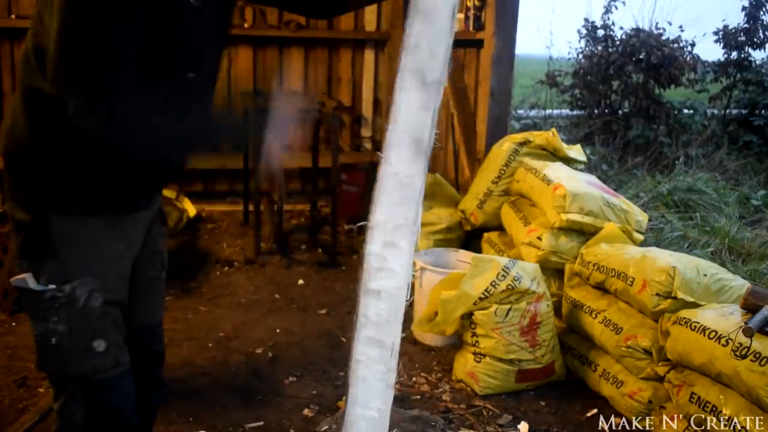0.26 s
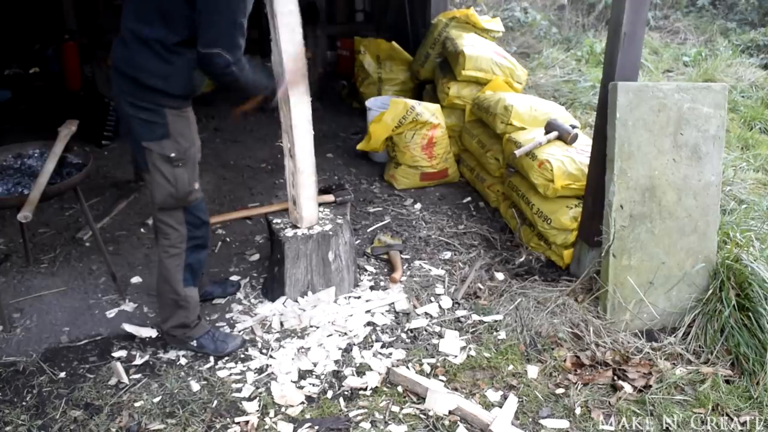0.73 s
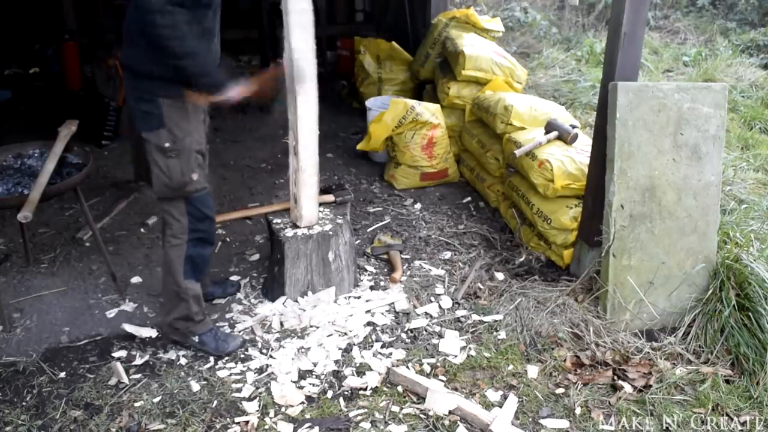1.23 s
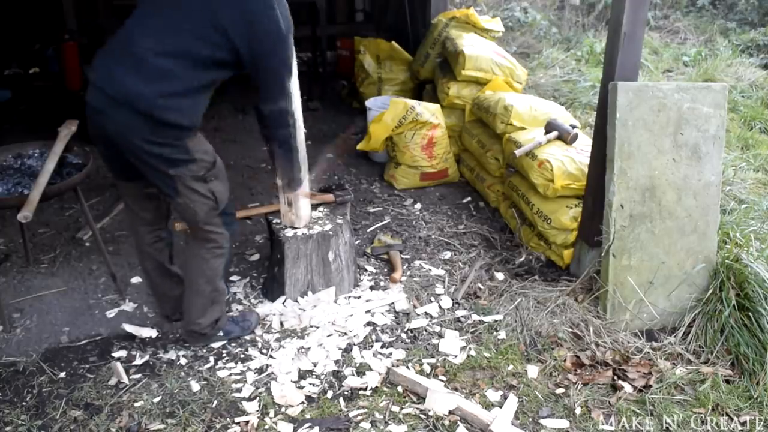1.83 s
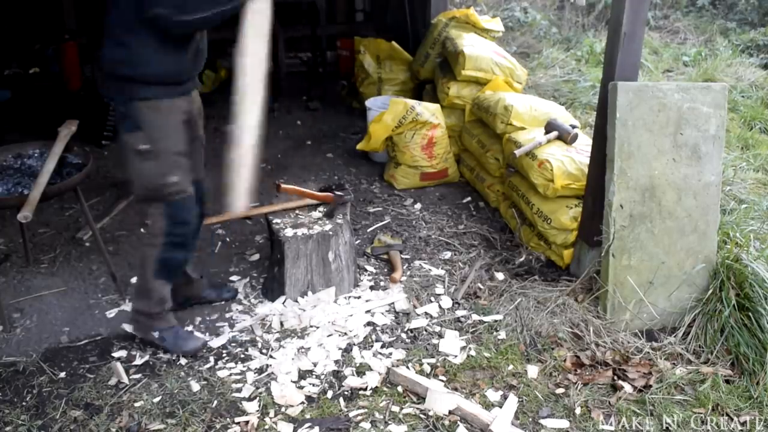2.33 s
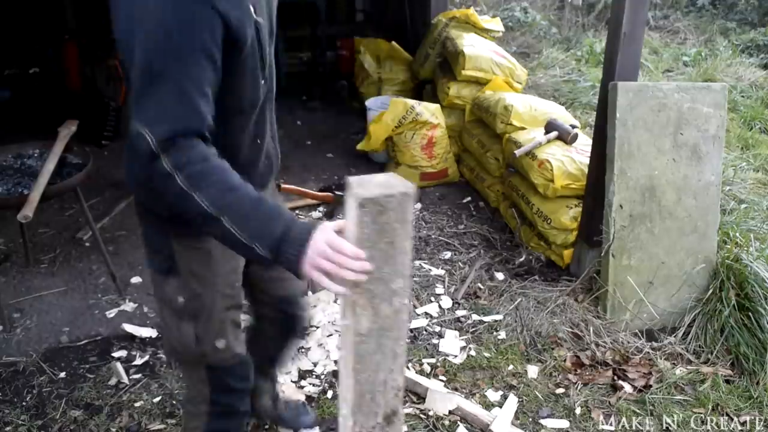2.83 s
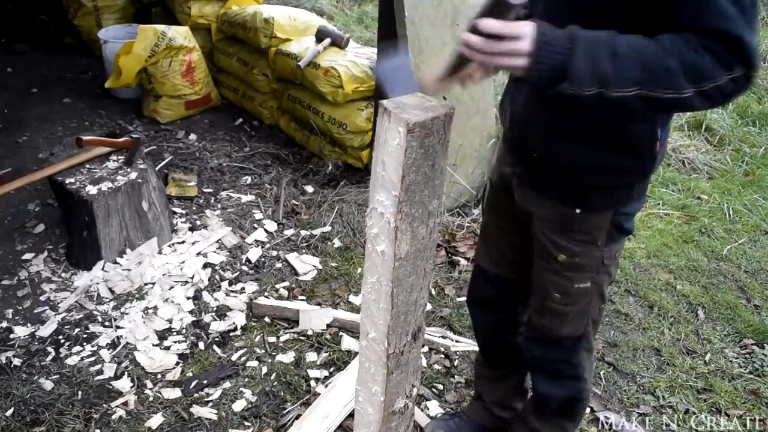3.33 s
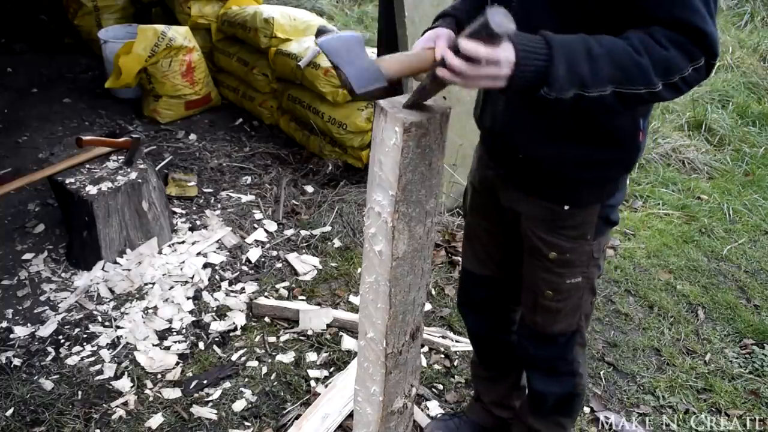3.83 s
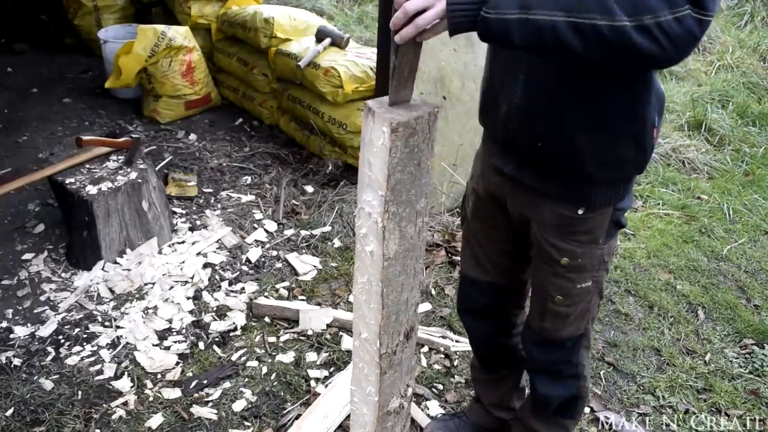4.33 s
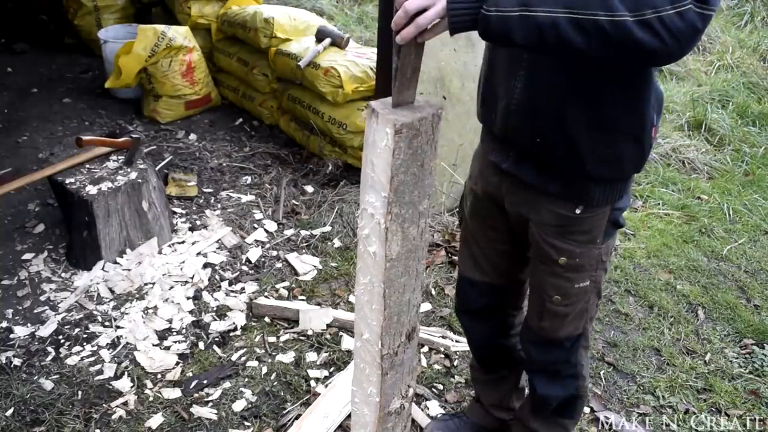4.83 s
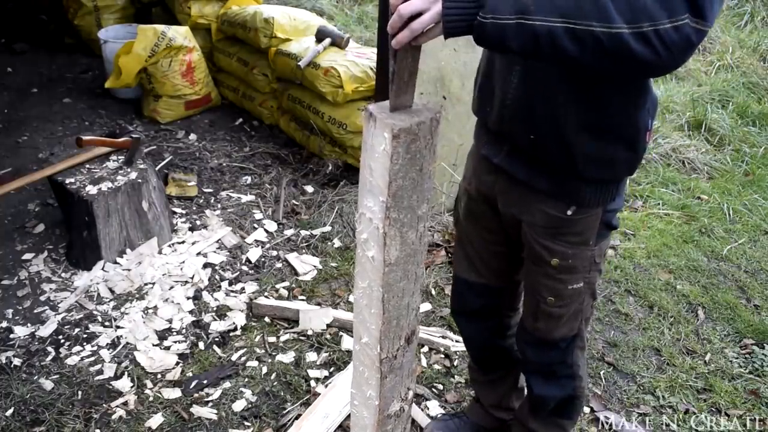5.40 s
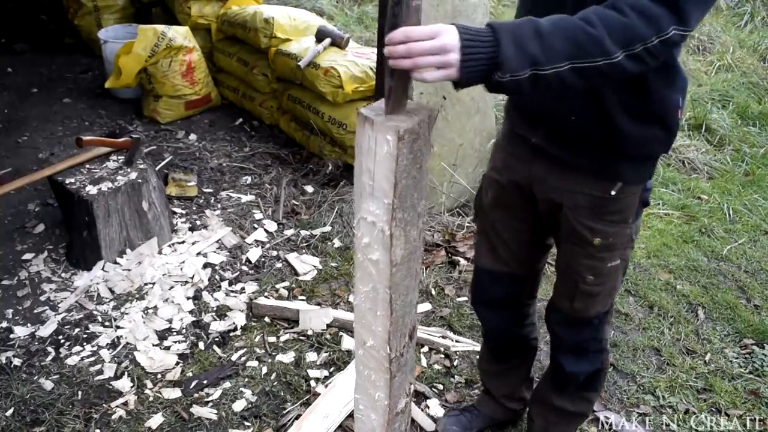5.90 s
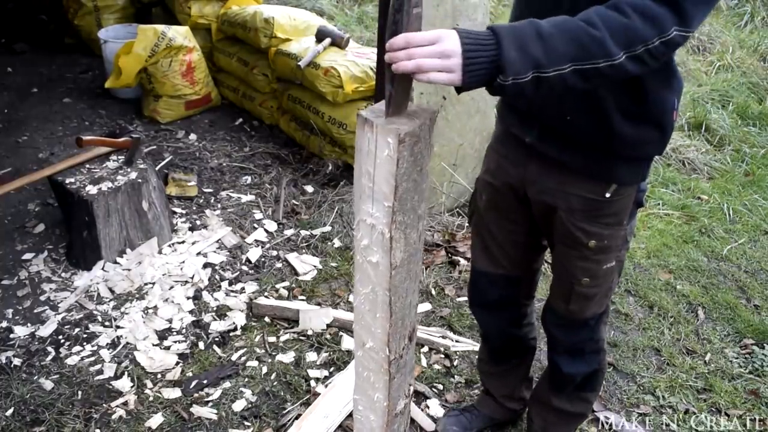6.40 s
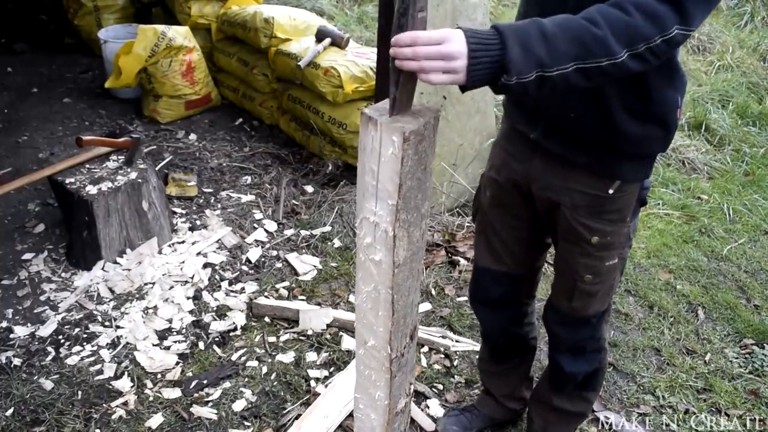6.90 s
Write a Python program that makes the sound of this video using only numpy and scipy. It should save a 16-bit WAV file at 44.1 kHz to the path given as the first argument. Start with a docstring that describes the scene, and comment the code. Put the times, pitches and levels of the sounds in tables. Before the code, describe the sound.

Outdoors by a shed, quiet wind hiss surrounds close, dry work sounds. From 0.1 to 1.1 seconds a hatchet makes nine sharp, splintery chops on an upright plank, the first two strongest and more echoing; the background changes abruptly near 0.35. Tiny chip clicks follow, and at 1.9 the blade sticks into a block with a short damped knock. Chips crunch around 2.5 to 3.1, with a dull low post thud at 2.8. Light taps seat a steel wedge at 3.3 and 3.6, with a barely audible touch between. After a pause, hammering begins at 4.4 and continues to 7.1, about seven blows a second, slowing slightly: bright, hard steel cracks with a brief damped clang, mostly rising in pitch, hardest at 6.4. Yard echo thickens, low wind thumps buffet the microphone and loud peaks clip.

```python
"""Hatchet and wedge at a shed front

At the open front of a shed a hatchet chips quickly at an upright plank and is stuck into the block.
A post is set down, a steel wedge is tapped into its end, then hammered home in a long run of ringing blows.
Each contact is a shaped noise crack plus dying modes and a short yard echo; chips crunch underfoot.
Shaped noise makes the hedge, the field and the gusts on a mono microphone, limited and clipped when loud."""
import sys
import numpy as np
from scipy import signal
from scipy.io import wavfile
from scipy.ndimage import uniform_filter1d

SR = 44100
rng = np.random.default_rng(int(sys.argv[2]) if len(sys.argv) > 2 else 0)


def pcm_store(signal):
    """Save signal as 16-bit PCM."""
    levels = np.round(np.clip(np.atleast_2d(signal), -1, 1) * 32767)
    wavfile.write(sys.argv[1], SR, levels.astype(np.int16).T)


N = 315315  # length [samples]

# hammer on the wedge: (time [s], relative force [dB], crack brightness [dB per octave])
HAMMER_BLOWS = [(4.4276, -7, 1), (4.553, -1.5, 0.3), (4.6796, -6, 1.8), (4.805, -0.5, -0.5),
                (4.9366, -6.5, 2.5), (5.0695, -9.5, 0.5), (5.2004, -8.5, 2), (5.3281, -1, 1.5),
                (5.4634, -9.5, 0.5), (5.5954, -5, 0.6), (5.761, -2.5, 1.56), (5.9085, -3.5, 1.5),
                (6.0664, -4.5, 1.5), (6.229, -2.5, 2.5), (6.3882, 3, 1.5), (6.5523, -3.5, 3.5),
                (6.7255, -2.5, 3), (6.8906, -2, 2.7), (7.0549, -9, 3)]
# hold of the wood on the wedge; the blade note mostly climbs and the yard answers more:
# (time [s], blade note [Hz], its level [dB], clang level [dB], yard echo level [dB]), all levels relative
WEDGE_GRIP = [(4.43, 5900, -25, -6, -7), (4.9, 5770, -9.5, 5, -2.5), (5.46, 5800, -13, 0.5, -3.5),
              (5.6, 5900, -7, -3, -0.5), (6.23, 6350, -6.5, -1, 3), (6.42, 7300, -8, 1, 6),
              (6.89, 7480, 0, -3.5, 4), (7.05, 6950, 3.5, 3.5, 1.5)]
# wedge damped by hand and wood, its modes merging into a clang:
# (nominal frequency [Hz], relative level [dB], t60 [s])
WEDGE_MODES = [(2445, -18, .045), (2790, -20, .022), (4700, -22, .015), (4920, -22, .015), (7930, -21, .03),
               (9940, -21, .012), (11520, -13, .022), (11880, -10, .02), (12900, -22, .015),
               (14700, -14, .025)]
# colour of steel on steel: (frequency [Hz], relative level [dB])
STEEL_COLOUR = [(40, -7.5), (200, -4.5), (600, -8.5), (1200, -10.5), (1900, -5), (2600, -0.5), (3600, -5.5),
                (5600, 0.5), (8000, -0.5), (12000, 2), (16000, -1)]


def hammering():
    """Steel meets steel: a crack, a damped clang and a blade note that follow the grip of the wood."""
    ring_lag = 0.93  # the clang's modes fall back by this many dB per dB of force
    when, *grip = np.transpose(WEDGE_GRIP)
    rows = []
    for s, force_db, tilt_db in HAMMER_BLOWS:
        note_hz, note_db, clang_db, echo_db = (np.interp(s, when, column) for column in grip)
        rows.append((s, force_db, tilt_db, clang_db - ring_lag * force_db, echo_db, note_hz, note_db))
    return strikes(rows, WEDGE_MODES, STEEL_COLOUR, level_db=7.5, ring_db=-6.5, wet_db=1.0,
                   crack_s=0.00095, push=2.41, near_s=.0018, near_gain=.5, blade_t60=.008)


# hatchet on the plank:
# (time [s], relative force [dB], crack brightness [dB per octave], relative note of the axe head [dB])
HATCHET_CHOPS = [(.075, 6.5, 1, -15), (0.2577, 2.5, 5, -12), (0.4494, -2, -1, -9.5), (0.5486, -5, 0, -1.5),
                 (.6396, -7, -0.5, 1), (0.7635, -4.5, 1.5, -0.5), (0.8552, -0.5, 2, 0),
                 (0.9729, -6.5, -1, -4), (1.085, -8, -0.6, -6)]
# ring and yard echo, both weaker from the second row on:
# (from time [s], relative ring level [dB], relative yard echo level [dB])
CHOP_RESONANCE = [(0, 3, -4), (.345, -5, -10)]
# modes of hatchet and plank: (nominal frequency [Hz], relative level [dB], t60 [s])
HATCHET_MODES = [(1420, -18.5, 0.045), (1563, -19.5, 0.053), (2052, -21, 0.056), (2450, -11, 0.012),
                 (2996, -17, 0.057), (3133, -5, 0.02), (3396, -7, 0.015), (3900, -52, 0.018),
                 (7070, -17.5, 0.036)]
# colour of blade on plank: (frequency [Hz], relative level [dB])
CHOP_COLOUR = [(60, -7.5), (500, -3), (1100, -3.5), (1600, 0.5), (3200, 6.5), (5500, 6), (7200, -1.5),
               (8500, -3.5), (11000, -7), (16000, -10.5)]


def chopping():
    """Fibres crack; a harder chop raises crack and head note, while the ring of the modes stays even."""
    head_hz, ring_lag = 5150, 1  # nominal note [Hz], fall of the modes in dB per dB of force
    rows = []
    for s, force_db, tilt_db, head_db in HATCHET_CHOPS:
        _, ring_db, echo_db = CHOP_RESONANCE[int(s > CHOP_RESONANCE[1][0])]
        rows.append((s, force_db, tilt_db, ring_db - ring_lag * force_db, echo_db, head_hz, head_db))
    return strikes(rows, HATCHET_MODES, CHOP_COLOUR, level_db=-1, ring_db=3, wet_db=-3,
                   crack_s=0.0011, push=2.58, near_s=0.0068, near_gain=0.26, blade_t60=.028)


# light taps that seat the wedge, all levels relative: (time [s], force [dB], brightness [dB per octave],
# ring level [dB], yard echo level [dB], nominal blade note [Hz], its level [dB])
WEDGE_TAPS = [(3.3406, -17, 0.2, -23, -14, 1414, 9), (3.511, -48, -5.5, -4, -4, 1380, -1),
              (3.6417, -12.5, 0.5, -10, -6, 2757, 2)]
# modes of the loose wedge: (nominal frequency [Hz], relative level [dB], t60 [s])
LOOSE_WEDGE_MODES = [(2580, -14, 0.093), (3160, -10, 0.047), (4790, -4.5, 0.021)]
# colour of a light tap: (frequency [Hz], relative level [dB])
TAP_COLOUR = [(60, -18), (800, 5), (1550, 16.5), (2300, 9.5), (4500, -5), (8000, -13), (16000, -22)]


def tapping():
    """A loose wedge rings longer under soft contacts; its blade note ends higher as the wood grips."""
    return strikes(WEDGE_TAPS, LOOSE_WEDGE_MODES, TAP_COLOUR, level_db=2.5, ring_db=4.5, wet_db=-14.0,
                   crack_s=0.0014, push=0.29, near_s=0.00066, near_gain=0.12, blade_t60=0.039)


# hatchet left in the block, all levels relative:
# (time [s], force [dB], brightness [dB per octave], ring level [dB], yard echo level [dB])
BLOCK_HIT = [(1.9099, -8.5, 0, 0, -3)]
# modes of the block: (nominal frequency [Hz], relative level [dB], t60 [s])
BLOCK_MODES = [(640, -15, .015), (800, -13, .015), (950, -10, .018), (1130, -9, .018), (1400, -12, .018),
               (4550, -17, .012)]
# colour of blade in block: (frequency [Hz], relative level [dB])
BLOCK_COLOUR = [(60, -5), (400, -10), (900, 12), (2000, 4), (4600, 5), (8000, -0.5), (16000, -13)]


def lodging():
    """The blade sticks in the block, whose heavily damped modes give a short knock."""
    return strikes(BLOCK_HIT, BLOCK_MODES, BLOCK_COLOUR, level_db=2.5, ring_db=3.0, wet_db=-8.5,
                   crack_s=0.0022, push=2.5, near_s=0.0045, near_gain=0.43)


# post set on the ground, all levels relative:
# (time [s], force [dB], brightness [dB per octave], ring level [dB], yard echo level [dB])
POST_LANDING = [(2.8076, -16.5, 0, 0, -7)]
# modes of the post: (nominal frequency [Hz], relative level [dB], t60 [s])
POST_MODES = [(215, -7, .03), (265, 1, .03), (315, -14, .13), (355, -15, .13), (1082, -16, .04),
              (1410, -22, .04)]
# colour of post on ground: (frequency [Hz], relative level [dB])
GROUND_COLOUR = [(40, -8), (120, 3), (250, 16), (1000, 9.5), (2200, 3.5), (6000, -6), (16000, -9)]


def setting_down():
    """The post lands on the ground with a dull contact and low wooden modes."""
    return strikes(POST_LANDING, POST_MODES, GROUND_COLOUR, level_db=2, ring_db=6, wet_db=-9.0,
                   crack_s=0.0023, push=1.6, near_s=0.0017, near_gain=0.2)


# chips underfoot and small handling clicks: (time [s], relative level [dB], decay to 1/e [s])
CHIP_CLICKS = [(.714, -24.5, 0.00086), (1.146, -28, 0.0018), (1.1634, -31, 0.0016), (1.463, -32, 0.0077),
               (1.595, -31.5, 0.005), (1.61, -31, 0.0036), (2.519, -29.5, 0.0012), (2.6254, -20, 0.0012),
               (2.634, -26.5, 0.0018), (2.741, -33, 0.0092), (2.96, -34.5, 0.0068), (3.109, -24.5, 0.0014)]
# colour of snapping chips: (frequency [Hz], relative level [dB])
CHIP_COLOUR = [(100, -28), (1000, -4.5), (2500, 2.5), (5500, 1), (9000, -2), (16000, -11)]


def crunches():
    """Dry chips snap in tiny clusters of clicks: noise of uneven size that dies away."""
    out, t = np.zeros(N), moments()
    for s, db, decay_s in CHIP_CLICKS:
        uneven_decay = np.exp(.5 * rng.standard_normal(len(t)) - t / decay_s)
        snaps = coloured(rng.standard_normal(len(t)) * uneven_decay, CHIP_COLOUR)
        add(out, s, gain_of(db + 1.5) * yard(snaps, wet_db=-15, near_s=0.0014, near_gain=0.17))
    return out


# steady background, stepping in level at each row: (from time [s], hedge level [dB], field level [dB],
# rustle level [dB], buffeting level [dB], drone level [dB])
BACKGROUND_LEVELS = [(0, -62, -47.5, -47.5, -59, -66), (0.347, -45, -85, -61, -57.5, -72),
                     (3.185, -54, -68, -63, -60.5, -80), (4.31, -51.5, -45.5, -50, -62, -69),
                     (5.54, -58.5, -50, -48.5, -61, -56.5)]
# swells above that background: (peak time [s], level [dB], length [s])
GUST_SWELLS = [(0.398, -36.5, 0.17), (0.74, -36, 0.082), (.92, -40.5, 1.0), (1.95, -51.5, 0.42),
               (3.02, -45.5, 0.32), (3.58, -52, 0.2), (5.563, -26.5, 0.016), (5.659, -30, 0.056),
               (5.82, -35, 0.032), (6.215, -26.5, 0.068), (6.303, -33, 1), (6.439, -15.5, 0.045),
               (6.622, -22, 0.083), (6.881, -31.5, 0.041)]
# hedge swells: (peak time [s], level [dB], length [s])
WIND_IN_HEDGE = [(2.3, -44, 0.52), (3.0, -43.5, 0.5)]
# field swell: (peak time [s], level [dB], length [s])
WIND_OVER_FIELD = [(5.6, -50, 2.5)]
# fine rustles: (peak time [s], level [dB], length [s])
RUSTLE_SWELLS = [(1.87, -45.5, 0.24), (2.68, -46.5, 0.25), (3.0, -48.5, .18), (3.23, -41.5, 0.065)]
# the far drone comes and goes: (peak time [s], level [dB], length [s])
FAR_DRONE_SWELLS = [(1.95, -61.5, 0.87), (4.903, -57.5, 0.59)]
# spectrum of still air, also of the faint noise that widens the channels:
# (frequency [Hz], relative level [dB per Hz])
AIR_SPECTRUM = [(25, -4), (100, -6.5), (450, 0.5), (1100, 2), (2700, -11.5), (4200, -21.5), (8000, -8),
                (16000, -6)]
# spectrum of wind in the hedge: (frequency [Hz], relative level [dB per Hz])
HEDGE_SPECTRUM = [(300, -41), (900, -15), (1600, -5.5), (2200, 2), (2650, -2.5), (3200, 0.5), (3950, -5.5),
                  (4500, -4), (5050, -4.5), (5600, -0.5), (6700, -6), (8000, -14), (11000, -21.5),
                  (16000, -60)]
# spectrum of wind over the field: (frequency [Hz], relative level [dB per Hz])
FIELD_SPECTRUM = [(100, -39), (330, 7), (600, -2), (1200, 7), (1700, 6), (2500, 6.5), (3100, 4),
                  (3800, 11.5), (4700, 5), (5900, 3.5), (7500, -2), (10000, -24), (16000, -8)]
# spectrum of fine rustle: (frequency [Hz], relative level [dB per Hz])
RUSTLE_SPECTRUM = [(500, -4), (4000, 5), (7000, 2.5), (10000, 0.5), (13500, 3), (16000, -14)]
# spectrum of the far drone: (frequency [Hz], relative level [dB per Hz])
DRONE_SPECTRUM = [(200, -28), (255, -12), (280, 0), (310, -9), (350, -5), (420, -28), (1500, -50)]
# spectrum of wind buffeting the microphone: (frequency [Hz], relative level [dB per Hz])
BUFFET_SPECTRUM = [(20, 14), (40, 3), (90, 2.5), (200, 2.5), (330, -1.5), (500, -6.5), (800, -15.5),
                   (1500, -30), (4000, -60)]


def outdoors():
    """Shaped noise for still air, hedge, field, fine rustle, a far drone and gusts on the microphone."""
    _, hedge_db, field_db, rustle_db, buffet_db, drone_db = np.transpose(BACKGROUND_LEVELS)
    air = gain_of(-51.5) * wash(AIR_SPECTRUM, patchy_db=1.7, flutter_db=1.0)
    hedge = strength(hedge_db, WIND_IN_HEDGE) * wash(HEDGE_SPECTRUM, patchy_db=0.85, flutter_db=0.94)
    field = strength(field_db, WIND_OVER_FIELD) * wash(FIELD_SPECTRUM, patchy_db=0.8, flutter_db=0.0)
    rustle = strength(rustle_db, RUSTLE_SWELLS) * wash(RUSTLE_SPECTRUM, patchy_db=3.9, flutter_db=3.5)
    drone = strength(drone_db, FAR_DRONE_SWELLS) * wash(DRONE_SPECTRUM, patchy_db=3.5, flutter_db=3.5)
    gusts = strength(buffet_db, GUST_SWELLS) * wash(BUFFET_SPECTRUM, patchy_db=2.5, flutter_db=2.0)
    return low_pass(air + hedge + field + rustle + drone + gusts, 15800)


def strength(steady_db, swells):
    """Amplitude over time: steady within each stretch, plus rounded swells confined to their own stretch."""
    end_drop_db, rise_share = 5.5, 0.54  # fall at both ends of a swell, share of its length spent rising
    t, starts = np.arange(N) / SR, [row[0] for row in BACKGROUND_LEVELS[1:]]
    stretch = np.searchsorted(starts, t)
    power = gain_of(steady_db)[stretch] ** 2
    for s, db, length in swells:
        inside = stretch == np.searchsorted(starts, s)
        away = (t[inside] - s) / length
        away = away / np.where(away < 0, rise_share, 1 - rise_share)
        power[inside] += gain_of(db - end_drop_db * away ** 2) ** 2
    return np.sqrt(power)


def wash(spectrum, patchy_db, flutter_db):
    """Noise of rms 1 with patches drifting over time and frequency, and a flutter shared by all bands."""
    frames, hz = N // 256 + 5, np.fft.rfftfreq(1024, 1 / SR)
    a, b, patches = rng.standard_normal((3, frames, len(hz)))
    patches = uniform_filter1d(patches, size=10, axis=0)
    patches = evened(uniform_filter1d(patches, size=10, axis=1))
    flutter = evened(uniform_filter1d(rng.standard_normal(frames), size=5))[:, None]
    level_db = read(spectrum, hz) + patchy_db * patches + flutter_db * flutter
    z = (a + 1j * b) * gain_of(level_db)
    return evened(signal.istft(z.T, nperseg=1024, noverlap=768)[1][:N])


def strikes(rows, modes, colour, level_db, ring_db, wet_db, crack_s, push, near_s, near_gain, blade_t60=None):
    """Each blow is a crack plus the ring of the struck thing, heard across the yard."""
    out = np.zeros(N)
    for s, force_db, tilt_db, own_ring_db, echo_db, *blade in rows:
        sound = coloured(crack(crack_s, push), colour, tilt_db)
        sound = sound + gain_of(ring_db + own_ring_db) * ring(modes)
        if blade:  # a steel blade adds its own note
            sound = sound + ring([(*blade, blade_t60)])
        heard = yard(sound, wet_db + echo_db, near_s, near_gain)
        add(out, s, gain_of(level_db + force_db) * heard)
    return out


def crack(decay_s, push):
    """A first sharp push, then a brief burst of crushing fibres or chattering steel, even in all bands."""
    t = moments()
    burst = rng.standard_normal(len(t)) * np.exp(-t / decay_s) + push * (t == 0)
    power = uniform_filter1d(abs(np.fft.fft(burst)) ** 2, size=41, mode="wrap")
    energy = decay_s * SR / 2 + push ** 2
    return causal(burst, .5 * np.log(energy / power))


def ring(modes):
    """Dying modes start from rest, neighbours in opposite directions; each blow lands a little differently."""
    t = moments()
    hz, db, t60 = np.transpose(modes)[:, :, None]
    share, detune = rng.standard_normal((2, len(modes), 1))
    sign = (-1) ** np.arange(len(modes))[:, None]
    waves = sign * np.sin(2 * np.pi * hz * (1 + .003 * detune) * t)
    onset = 1 - np.exp(-2 * t * hz)
    return (gain_of(db + .5 * share - 60 * t / t60) * waves * onset).sum(0)


# decay of the yard's scatter: (frequency [Hz], t60 [s])
YARD_DECAY = [(200, 0.04), (1500, 0.086), (3000, 0.099), (6000, 0.11), (12000, 0.11), (16000, 0.064)]
# colour of the yard's scatter: (frequency [Hz], relative level [dB])
YARD_TONE = [(100, 12.5), (600, 11), (1500, 5.5), (3000, 6.5), (6000, 3.5), (10000, -3), (16000, -2)]


def yard(x, wet_db, near_s, near_gain):
    """One near reflection, then dense scatter from ground, sacks and shed that dies quickly."""
    t = moments()
    build_up = np.clip((t - .003) / 0.0029, 0, 1)
    hz, when, z = signal.stft(rng.standard_normal(len(t)) * build_up, SR, nperseg=128)
    decay = gain_of(-60 * when / read(YARD_DECAY, hz)[:, None])
    tail = signal.istft(z * decay, SR, nperseg=128)[1][:len(t)]
    echo = gain_of(wet_db) * coloured(tail / np.linalg.norm(tail), YARD_TONE)
    echo[round(near_s * SR)] += near_gain
    return x + signal.fftconvolve(x, echo)[:len(t)]


def coloured(x, colour, tilt_db=0):
    """Gives a sound a spectrum, tilted about 4 kHz."""
    hz = abs(np.fft.fftfreq(len(x), 1 / SR))
    octaves = np.log2(np.maximum(hz, 300) / 4000)
    return causal(x, np.log(gain_of(read(colour, hz) + tilt_db * octaves)))


def causal(x, log_gain):
    """Filters by a gain curve in minimum phase, without any sound ahead of the attack."""
    return np.fft.ifft(np.fft.fft(x) * np.exp(np.conj(signal.hilbert(log_gain)))).real


def moments(size=8192):
    """Time axis of one blow [s]."""
    return np.arange(size) / SR


def gain_of(db):
    """Decibels to amplitude."""
    return 10 ** (np.asarray(db) / 20)


def evened(x):
    """Scales to rms 1."""
    return x / np.sqrt(np.mean(x ** 2) + 1e-20)


def read(points, hz):
    """Reads a table on a log-frequency axis."""
    f, value = np.transpose(points)
    return np.interp(np.log(hz + 1), np.log(f + 1), value)


def add(mix, s, sound):
    """Mixes a sound in at time s."""
    part = mix[round(s * SR):][:len(sound)]
    part += sound[:len(part)]


def low_pass(x, hz):
    """Steep cut above hz."""
    return signal.oaconvolve(x, signal.firwin(301, hz, window=("kaiser", 9), fs=SR), "same")


def scene():
    """Work and weather at one microphone; a very faint independent noise per channel gives slight width."""
    woodwork = hammering() + chopping() + tapping() + lodging() + setting_down() + crunches()
    mono = woodwork + outdoors()
    width = [gain_of(-65.5) * wash(AIR_SPECTRUM, patchy_db=5.5, flutter_db=2) for channel in range(2)]
    return mono + np.array(width)


def record(dry, low_cut_hz=32, limit_db=-7, recover_db_per_s=290, attack_s=0.0033, ceiling=1.0):
    """A limiter clamps down just after a loud crack and lets go steadily; peaks that slip past it clip."""
    over_db = np.maximum(20 * np.log10(abs(dry).max(0) + 1e-9) - limit_db, 0)
    fall = np.arange(N) * recover_db_per_s / SR
    held_db = np.maximum.accumulate(over_db + fall) - fall
    lag = np.exp(-1 / (attack_s * SR))
    duck_db = signal.lfilter([1 - lag], [1, -lag], held_db)
    clipped = np.clip(dry / gain_of(duck_db), -ceiling, ceiling)
    low_cut = signal.butter(2, low_cut_hz, "highpass", fs=SR, output="sos")
    lean = signal.sosfilt(low_cut, clipped)
    return np.array([low_pass(channel, 16400) for channel in lean])


dry = scene()
out = record(dry)
pcm_store(out)
```